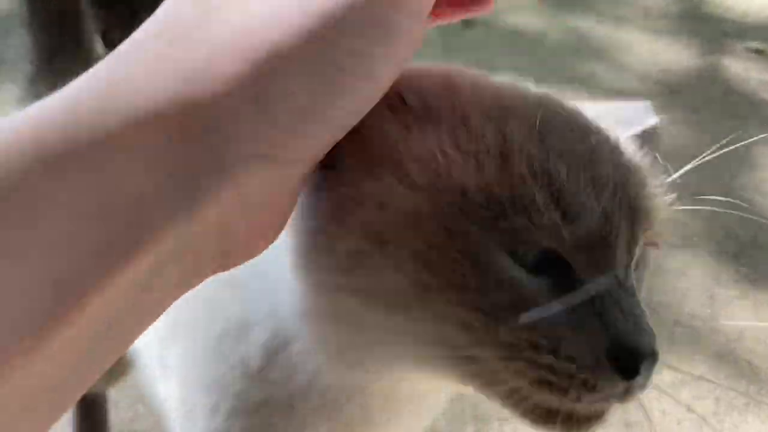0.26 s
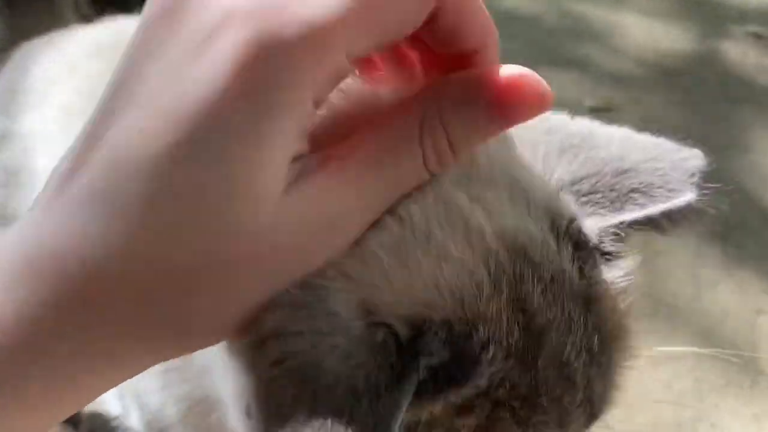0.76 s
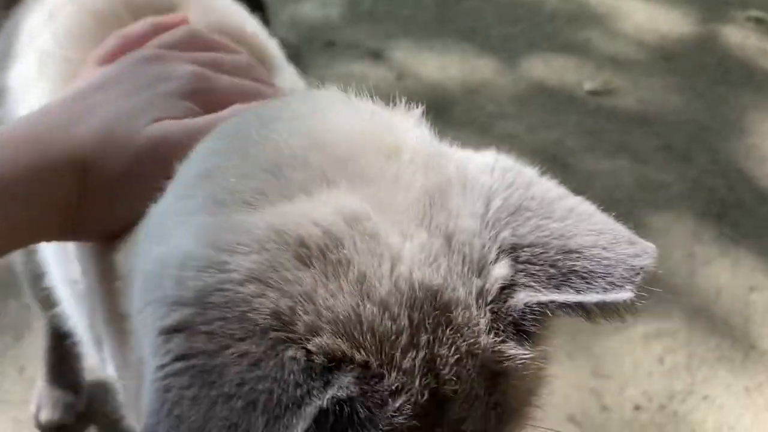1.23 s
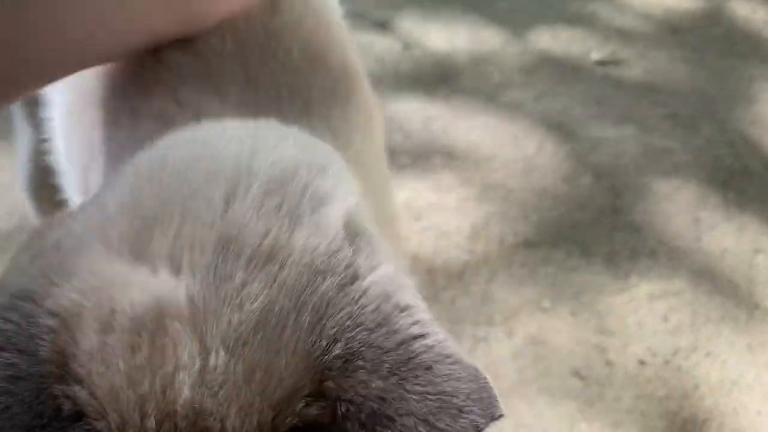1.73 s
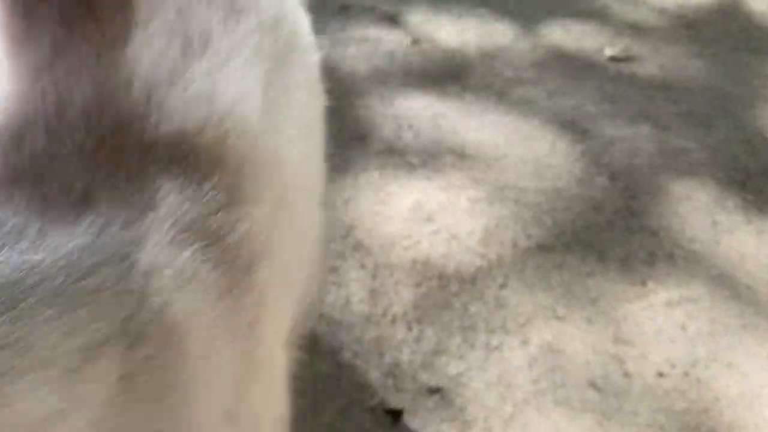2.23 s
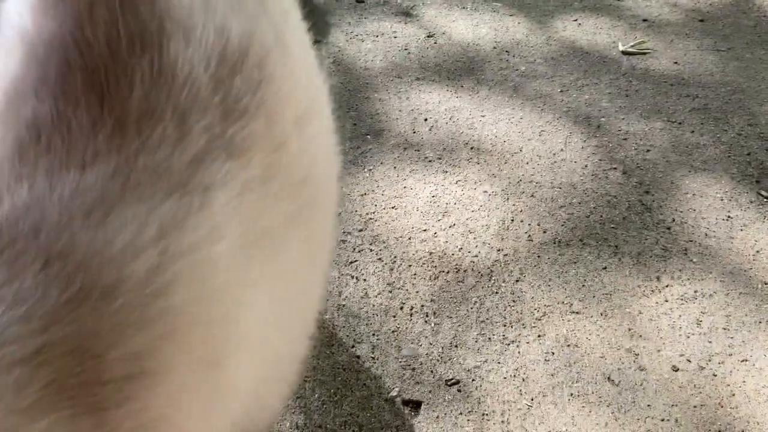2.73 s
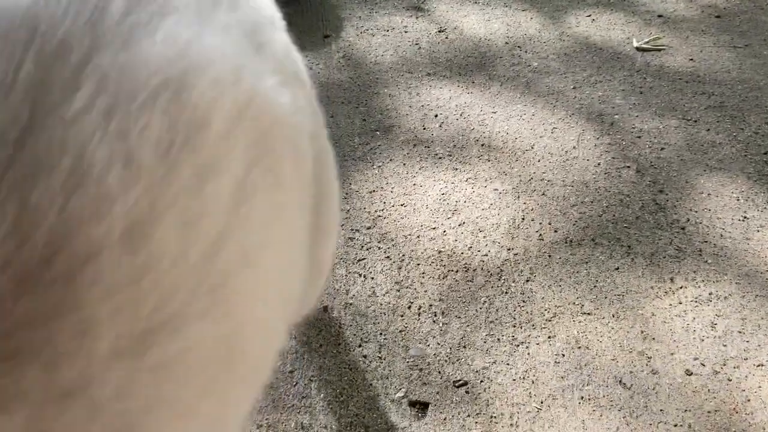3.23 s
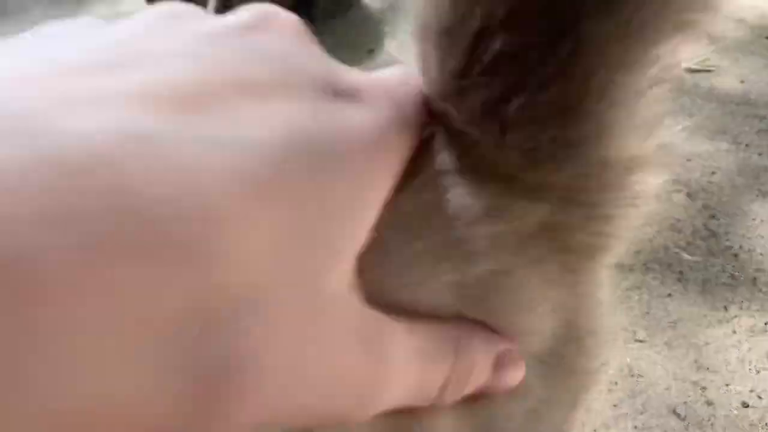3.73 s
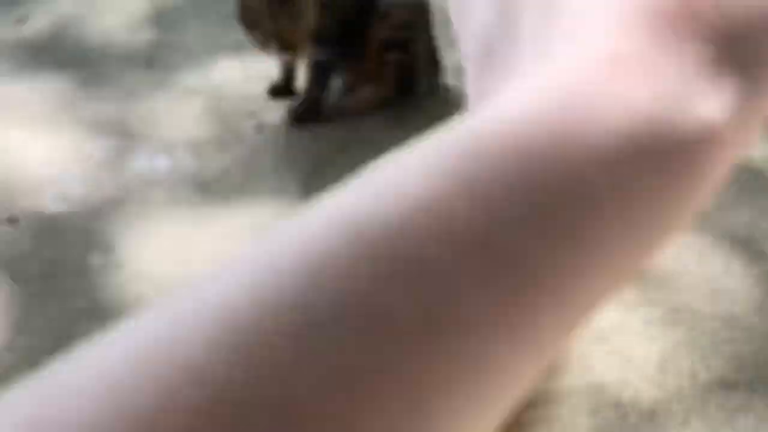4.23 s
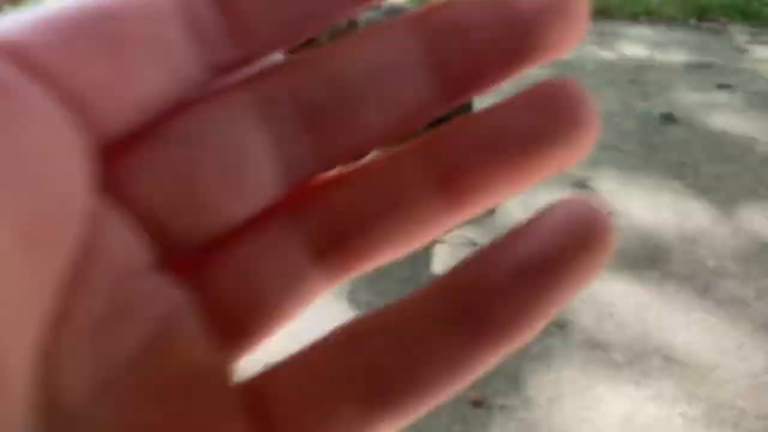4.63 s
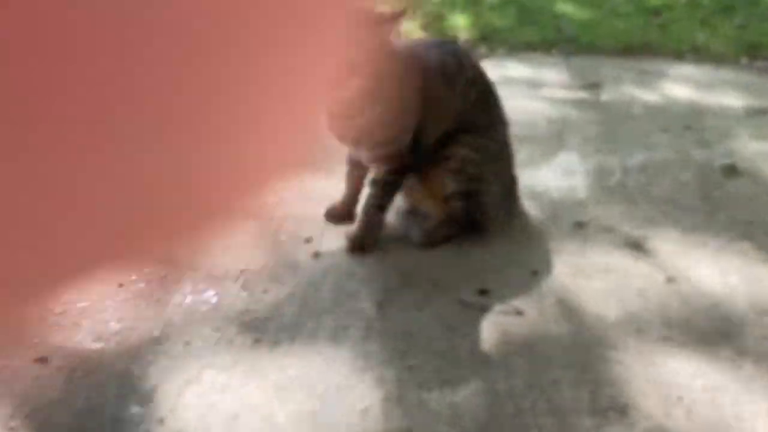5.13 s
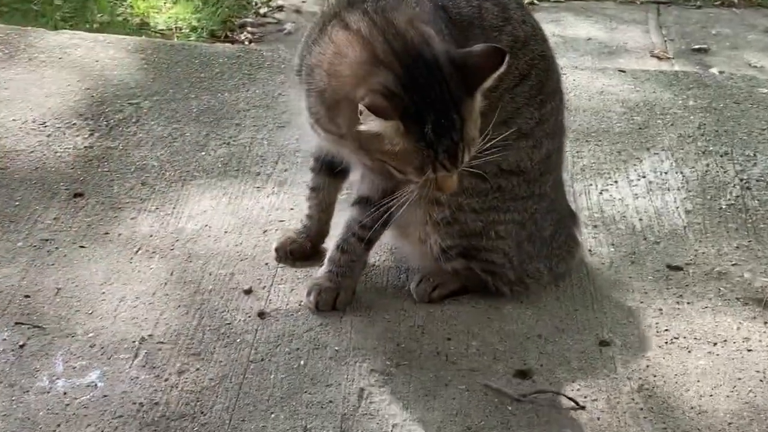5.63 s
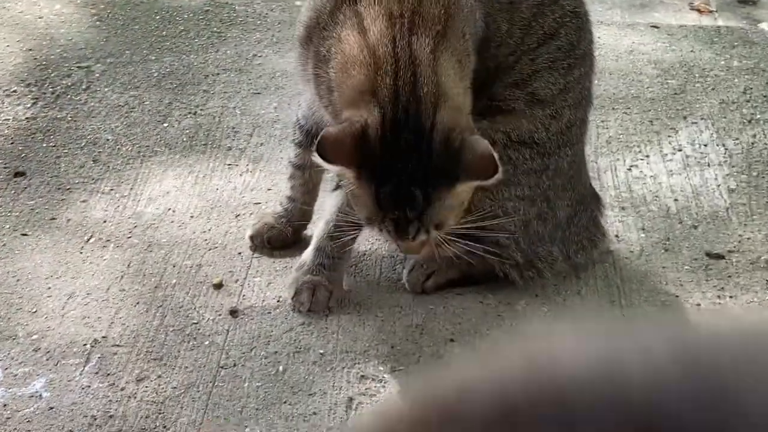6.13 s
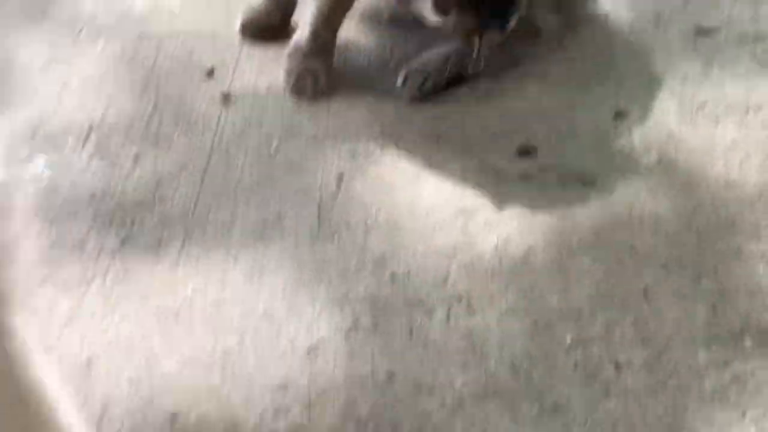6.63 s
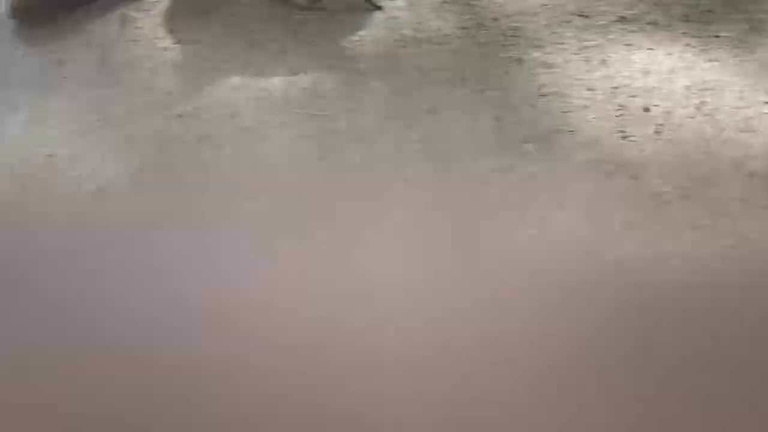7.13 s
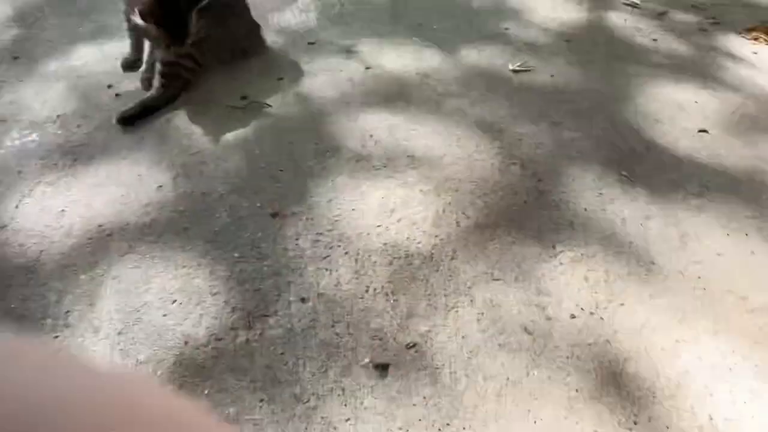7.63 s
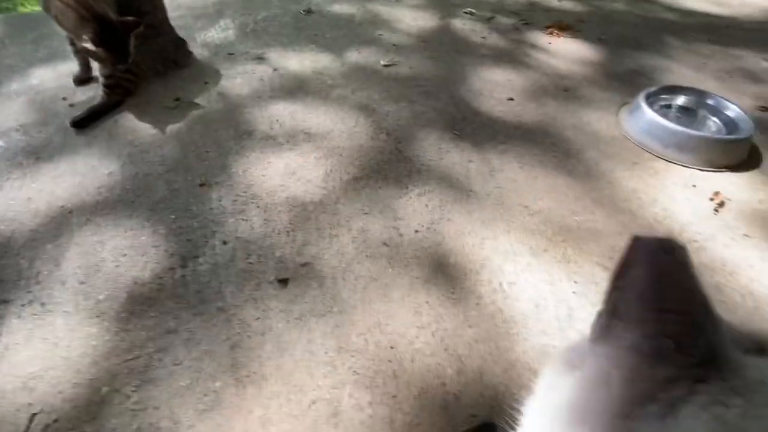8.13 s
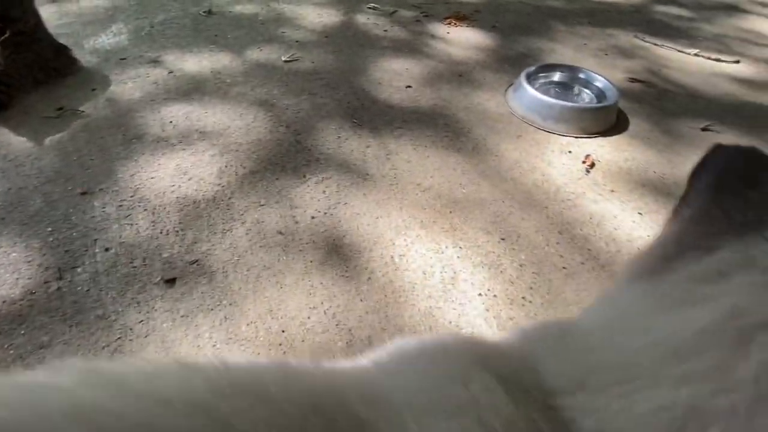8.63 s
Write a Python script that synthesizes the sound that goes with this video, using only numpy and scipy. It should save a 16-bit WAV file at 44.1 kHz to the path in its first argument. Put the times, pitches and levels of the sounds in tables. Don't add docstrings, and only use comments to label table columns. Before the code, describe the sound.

Close, hand-held outdoor sound: intermittent soft purring with a low chest hum, fur brushing and tiny claw or grit ticks. Short sliding bird trills appear in the first half. Low knocks of handling cluster in the middle, small brittle bites follow, and a heavy double bump comes before the purr returns. Behind are pulsing insects, breezy leaves, thin motor hum and low traffic.

```python
import sys
import numpy as np
from scipy import signal
from scipy.fft import rfft, irfft
from scipy.io import wavfile
from scipy.ndimage import uniform_filter1d

SR = 44100
rng = np.random.default_rng(int(sys.argv[2]) if len(sys.argv) > 2 else 0)


def boost_factor(decibels):
    exponent = np.asarray(decibels, float) / 20
    return 10 ** exponent


def generate_wav(signal):
    frames = np.transpose(np.atleast_2d(signal))
    scaled = np.clip(frames, -1, 1) * 32767
    pcm = np.round(scaled).astype(np.int16)
    wavfile.write(sys.argv[1], SR, pcm)


N = 391608
TIME = np.arange(N) / SR
HZ = np.maximum(np.arange(N // 2 + 1) * SR / N, 1)


def rms_one(x):
    return x / np.sqrt(np.mean(x ** 2) + 1e-20)


def in_time(rows):
    s, db = np.transpose(rows)
    return np.interp(TIME, s, db)


def at_hz(points):
    hz, db = np.transpose(points)
    return boost_factor(np.interp(np.log(HZ), np.log(hz), db))


def drift(rate_hz):
    r = np.exp(-80 * np.pi * rate_hz / SR)
    slow = signal.lfilter([1], [1, -2 * r, r * r], rng.standard_normal(N // 40 + 2002))[2000:]
    return np.interp(np.arange(N) / 40, np.arange(len(slow)), rms_one(slow))


def band(x, low_hz, high_hz, order=2):
    edges_hz = [low_hz, min(high_hz, SR / 2.2)]
    return signal.sosfilt(signal.butter(order, edges_hz, "band", fs=SR, output="sos"), x)


def ring(clicks, hz, t60_s):
    r, w = boost_factor(-60 / (t60_s * SR)), 2 * np.pi * hz / SR
    return signal.lfilter([0, np.sin(w)], [1, -2 * r * np.cos(w), r * r], clicks + 1e-18)


def swell(clicks, hz, t60_s):
    rung = ring(ring(clicks, hz, t60_s), hz * 1.04, t60_s * .75)
    return rung * clicks.max() / np.abs(rung).max()


def spell(start_s, end_s, edge, t=TIME):
    from_edge_s = np.minimum(t - start_s, end_s - t)
    return np.clip(from_edge_s / (edge * (end_s - start_s)), 0, 1) ** 2


def hum(start_s, end_s, hz, level_db, edge):
    out, on = np.zeros(N), slice(int(start_s * SR), int(end_s * SR))
    wobble = rng.random() + .05 * np.sin(2 * np.pi * (1.3 * TIME[on] + rng.random()))
    tone = np.sin(2 * np.pi * (hz * TIME[on] + wobble))
    out[on] = spell(start_s, end_s, edge, TIME[on]) * boost_factor(level_db) * tone
    return out


def evenly(first_s, last_s, rate_hz):
    return np.linspace(first_s, last_s, round((last_s - first_s) * rate_hz) + 1)


def placed(x, pan_db):
    return x * boost_factor(np.multiply.outer([.5, -.5], pan_db)).reshape(2, -1)


def wide(gain, side_gain):
    quarter_share = 0.54
    mid, other = rfft(rng.standard_normal((2, N)))
    side = side_gain * (quarter_share * 1j * mid + np.sqrt(1 - quarter_share ** 2) * other)
    mid, side = irfft(gain * np.array([mid, side]), N)
    return np.array([mid + side, mid - side]) / mid.std()


def add(out, start_s, sound):
    i = max(round(start_s * SR), 0)
    out[:, i:i + sound.shape[1]] += sound[:, :N - i]


def purr():
    # first_s, last_s, top_effort_db, tiring_db_per_s, pan_db (L-R)
    bouts = [
        (0.272, 0.556, -59, 24, 3),
        (1.647, 2.064, -69, -7, 9),
        (6.623, 6.808, -58.5, 64, 0),
        (7.934, 8.367, -60.5, 5, 0),
        (8.511, 8.682, -61, 55, -10),
    ]
    # hz, level_db, t60_s
    body = [(176, -1.5, 0.056), (330, -11.5, 0.029), (960, -15, 0.013)]
    throat_hz, rise_s, rise_db = 557, 0.07, 17
    out = np.zeros((2, N))
    for first_s, last_s, top_db, tiring_db, pan_db in bouts:
        at = evenly(0, last_s - first_s, 28)
        for s, chance in zip(at, rng.standard_normal((20, 6))):
            effort_db = top_db - rise_db * max(1 - s / rise_s, 0) - tiring_db * max(s - rise_s, 0)
            snap = np.zeros(SR // 20)
            snap[0] = boost_factor(effort_db + 8.5 + 1.5 * chance[1])
            hz = throat_hz * (1.05 - 0.091 * s / at[-1] + 0.061 * chance[2])
            rings = swell(snap, hz, 0.02)
            for (body_hz, db, t60_s), c in zip(body, chance[3:]):
                rings = rings + boost_factor(db + 2.1 * c) * swell(snap, body_hz, t60_s)
            add(out, first_s + s + 0.00064 * chance[0], placed(rings, pan_db))
    return out


def chest_hum():
    # start_s, end_s, purr_rate_hz, second_multiple_db, third_multiple_db
    breaths = [(0.155, .6, 28.04, -58, -58), (0.683, 1.446, 28.22, -51, -56),
               (1.604, 1.95, 28.1, -56, -58.5), (1.945, 2.35, 28.2, -54, -68),
               (3.05, 3.445, 28.1, -59, -62), (3.597, 4.05, 28.3, -55.5, -61),
               (4.16, 4.5, 27.84, -54.5, -62), (7.65, 8.1, 27.2, -60, -68), (8.14, 8.8, 28.2, -57.5, -64.5)]
    chest = 0
    for start_s, end_s, hz, second_db, third_db in breaths:
        chest = chest + hum(start_s, end_s, 2 * hz, second_db + 2.0, edge=0.31)
        chest = chest + hum(start_s, end_s, 3 * hz, third_db + 5.5, edge=0.22)
    return placed(chest, -1.3)


def bumps():
    # start_s, peak_db, start_hz, end_hz, swell_s
    knocks = [
        (4.589, -34.5, 205, 74, 0.016),
        (4.625, -31, 108, 77.5, 0.013),
        (4.853, -30, 220, 62, .011),
        (5.071, -43, 303, 90, 0.0043),
        (5.431, -50, 257, 152, 0.016),
        (7.258, -30, 130.8, 64, 0.01),
    ]
    # start_s, peak_db, start_hz, end_hz, swell_s
    pulls = [
        (7.1327, -19.5, 445, 58, 0.011),
    ]
    out, t = np.zeros((2, N)), np.arange(0, .12, 1 / SR)
    for s, peak_db, start_hz, end_hz, swell_s, way in [(*row, 1) for row in knocks] + [(*row, -1) for row in pulls]:
        hz = end_hz + (start_hz - end_hz) * np.exp(-t / .0068)
        shape = (t / (2 * swell_s)) ** 1.42 * np.exp(1 - (t / (2 * swell_s)) ** 2)
        swoop = np.sin(2 * np.pi * np.cumsum(hz) / SR)
        add(out, s, placed(way * boost_factor(peak_db) * shape * swoop, -0.93))
    return out


def ticks():
    # start_s, peak_db, pitch_hz, pan_db (L-R)
    snaps = [(0.894, -54, 1170, -4), (1.465, -54, 802, -5), (1.884, -57, 2740, 14), (2.014, -53, 991, 4),
             (3.221, -51, 2740, 2), (4.587, -47, 702, 13), (4.838, -47, 2500, 8), (4.847, -49, 2680, -3),
             (5.039, -51, 802, -0.5), (5.069, -44.5, 904, 8), (5.087, -51, 4720, -17),
             (5.093, -38, 4700, 4), (6.204, -53, 4650, -0.5), (6.952, -51, 2430, 11), (7.052, -52, 2260, 2),
             (7.13, -42.5, 840, 2), (7.252, -44, 900, -1.0), (7.824, -52, 4700, -2), (7.97, -49, 802, 0.5)]
    out, t = np.zeros((2, N)), np.arange(0, .03, 1 / SR)
    for s, peak_db, hz, pan_db in snaps:
        snap = .35 * rng.standard_normal(len(t)) * np.exp(-t / .0018)
        snap[0] = 2
        tick = band(snap, 500, 3050) + 1.43 * band(snap, hz / 1.63, hz * 1.29)
        add(out, s, placed(boost_factor(peak_db - 2.5) * tick / np.abs(tick).max(), pan_db))
    return out


def bites():
    # middle_s, half_length_s, level_db, tilt_db_per_octave, mouth_pitch_ratio
    crunches = [
        (4.388, 0.021, -65.5, -4, 0.94),
        (5.442, 0.014, -55, -4, 1.01),
        (6.064, 0.017, -55, 0.5, .93),
        (6.883, 0.023, -62.5, -4.5, 0.93),
    ]
    # hz, width_hz, level_db
    mouth = [(1200, 260, 2.5), (2400, 440, 4), (3480, 350, 11), (4450, 680, 6), (5250, 540, 2.5)]
    out = np.zeros((2, N))
    for s, half_s, level_db, tilt_db, ratio in crunches:
        t = np.arange(-3 * half_s, 8 * half_s, 1 / SR)
        roughness_db = 3.5 * np.repeat(rng.standard_normal(len(t)), 40)[:len(t)]
        grains = rng.standard_normal(len(t)) * boost_factor(roughness_db)
        voiced = 0
        for hz, width_hz, db in mouth:
            resonance = band(grains, ratio * hz - width_hz / 2, ratio * hz + width_hz / 2)
            voiced = voiced + boost_factor(db + tilt_db * np.log2(hz / 2500)) * resonance
        shape = np.exp(-(t / half_s) ** 2) + .25 * (t > 0) * np.exp(-t / .04)
        add(out, s - 3 * half_s, placed(boost_factor(level_db) * shape * rms_one(voiced), -.3))
    return out


def brushes():
    # middle_s, half_length_s, level_db, low_hz, high_hz
    strokes = [(0.074, 0.059, -73.5, 1460, 3700), (0.917, 0.079, -76, 1500, 4980),
               (2.157, 0.058, -69.5, 1800, 3170), (3.025, 0.097, -73, 1870, 3280),
               (3.754, 0.082, -72.5, 1700, 3710), (4.564, 0.017, -63.5, 1200, 2050),
               (4.62, 0.078, -64, 450, 4640), (4.733, 0.054, -71, 796, 3040),
               (6.171, 0.13, -68.5, 2310, 5030), (7.154, 0.02, -62, 801, 15000),
               (7.853, 0.043, -64, 1000, 11000), (7.958, 0.026, -53.5, 8700, 15700),
               (7.952, 0.051, -66, 1510, 6200), (8.068, 0.0074, -58, 1200, 12000),
               (8.112, 0.043, -64.5, 1090, 3100)]
    out = np.zeros((2, N))
    for s, half_s, level_db, low_hz, high_hz in strokes:
        t = np.arange(max(-2.5 * half_s, -s), 2.7 * half_s, 1 / SR)
        snags = boost_factor(2.2 * np.repeat(rng.standard_normal(len(t) // 150 + 1), 150)[:len(t)])
        mid, side = band(snags * rng.standard_normal((2, len(t))), low_hz, high_hz)
        fibres = np.array([mid + 0.79 * side, mid - 1.06 * side]) / mid.std()
        add(out, s + t[0], boost_factor(level_db) * np.exp(-(t / half_s) ** 2) * fibres)
    return out


def bird():
    # first_note_s, last_note_s, first_hz, level_db, pan_db (L-R)
    trills = [
        (0.039, 0.173, 2500, -64.5, 8.5),
        (0.772, 0.929, 3250, -71.5, 3),
        (2.349, 2.672, 3480, -66.5, -2),
        (3.374, 3.544, 3240, -73, -1),
    ]
    notes_per_s, fall_hz_per_s = 31.2, 1340
    out, t = np.zeros((2, N)), np.arange(-.015, .05, 1 / SR)
    shape = np.exp(-(t / 0.01) ** 4) + 0.16 * (t > 0) * np.exp(-t / 0.011)
    for first_s, last_s, first_hz, level_db, pan_db in trills:
        at = evenly(first_s, last_s, notes_per_s)
        width_hz = 430 * (3480 / first_hz) ** 3.8
        for k, (s, chance) in enumerate(zip(at, rng.standard_normal((16, 2)))):
            share = (s - first_s) / (last_s - first_s)
            hz = (first_hz - fall_hz_per_s * (s - first_s)) * (1 + .012 * chance[0])
            breath = rng.standard_normal(len(t) + 500)
            note = rms_one(band(breath, hz - width_hz / 2, hz + width_hz / 2)[500:])
            if width_hz < 700:
                note = note + np.sin(2 * np.pi * hz * t * (1 - 1.5 * t))
            arch_db = -14 * (share - .42) ** 2 - 2.0 * (k % 2)
            note_db = level_db - 3.0 + arch_db + 2.0 * chance[1]
            add(out, s + t[0], placed(boost_factor(note_db) * shape * note, pan_db))
    return out


def chorus(zeal_db, keen_db):
    # hz, width_hz, level_db, side_mid_db
    resonances = [(6470, 410, 2, -6), (7280, 710, -2.5, -10), (8000, 250, -9, 0.5)]
    throb_s, throb_first_s = .322, 5.74
    throb_db = (0.34 + .2 * keen_db) * np.cos(2 * np.pi * (TIME - throb_first_s) / throb_s)
    buzz = 0
    for hz, width_hz, db, side_db in resonances:
        buzz_db = 1.1 * drift(30) + 1.2 * drift(4.2)
        buzz = buzz + boost_factor(db + buzz_db) * wide(1 / (1 + (2 * (HZ - hz) / width_hz) ** 2), boost_factor(side_db))
    return boost_factor(zeal_db + throb_db) * buzz / buzz.mean(axis=0).std()


def chirper(keen_db):
    chirp_s, chirp_first_s = .355, 0.555
    chirp_db = 2 * np.cos(2 * np.pi * (TIME - chirp_first_s) / chirp_s)
    bursts_db = 1.2 * drift(6) + 1.5 * drift(25)
    level_db = -80.5 + 0.6 * keen_db + chirp_db - 1.0 + bursts_db
    return boost_factor(level_db) * wide(1 / (1 + ((HZ - 4680) / 210) ** 2), 0.79)


def whine():
    # start_s, end_s, level_db
    spells = [
        (2.1, 3.496, -90),
        (3.75, 5.31, -88.5),
        (5.995, 6.495, -107),
        (7.997, 8.945, -89),
    ]
    turns = 2736 * TIME + .2 * drift(8) + np.array([[.1], [-.1]])
    waver_db = 2.5 * drift(6)
    strength = boost_factor(-88) + sum(boost_factor(db) * spell(a, b, edge=0.072) for a, b, db in spells)
    return strength * boost_factor(6.5 + waver_db) * np.sin(2 * np.pi * turns)


def insects():
    zeal_db = in_time([(0, -63.5), (.3, -66.5), (4.4, -67), (5.0, -62), (5.75, -61.5), (6.4, -60.5),
                       (6.52, -63.5), (7.05, -64), (7.5, -60.5), (7.8, -59), (8.2, -64), (8.88, -63)])
    keen_db = zeal_db - zeal_db.min()
    return chorus(zeal_db, keen_db) + chirper(keen_db) + whine()


def leaves():
    near_db = in_time([(0, -85), (.25, -83.5), (.45, -75.5), (.75, -77), (1.0, -75), (1.75, -73.5),
                       (2.5, -76), (2.95, -80), (3.45, -76.5), (3.6, -72), (3.95, -72), (4.4, -79),
                       (4.62, -72), (4.95, -80.5), (6.3, -79.5), (7.15, -73), (7.9, -72), (8.88, -73.5)])
    # hz, level_db_per_hz
    spectrum = [(1500, -18), (2500, 5.5), (3800, 3.5), (5400, -1), (8000, 1), (10000, -12), (11800, -7),
                (14500, -4), (16000, -7)]
    side = at_hz([(1500, -7), (2500, -2), (4000, -1), (4700, -14), (5400, -24), (7000, -1), (9000, 11)])
    far_db = -88 + 0.33 * (near_db - near_db.mean())
    bright = 1 / (1 + (8800 / HZ) ** 12)
    colour = at_hz(spectrum) / (1 + (1300 / HZ) ** 4)
    far = boost_factor(far_db + 11.0 + 1.0 * drift(2.2)) * wide(colour * np.sqrt(1 - bright), side)
    near = 0
    for half in (HZ < 12000, HZ >= 12000):
        near = near + boost_factor(near_db + 1.0 + 1.3 * drift(9.2)) * wide(colour * np.sqrt(bright) * half, 1.1)
    return far + near


def motors():
    # hz, level_db
    steady = [(107.7, -59.5)]
    # start_s, end_s, hz, level_db
    passing = [
        (2.6, 4.6, 71.4, -64),
        (5.3, 7.6, 166.7, -60.5),
        (8.15, 8.85, 147.3, -69),
    ]
    lines = sum(hum(*row, edge=0.26) for row in passing)
    for hz, db in steady:
        turns = hz * TIME + 0.037 * drift(1.0)
        lines = lines + boost_factor(db + 2 + .9 * drift(0.96)) * np.sin(2 * np.pi * turns)
    return placed(lines, -1.3)


def traffic():
    rumble_db = in_time([(0, -51), (1.0, -51), (1.5, -53), (3.0, -53), (4.4, -56), (5.6, -50.5),
                         (6.2, -55.5), (6.9, -51.5), (8.0, -59.5), (8.6, -59.5), (8.88, -53.5)])
    # hz, level_db_per_hz
    spectrum = [(13, -59), (22, -14), (62, 6.5), (101, -1), (150, -8.5), (215, -13), (325, -13), (474, -23),
                (544, -23.5), (1050, -35.5), (1930, -38.5), (2500, -39), (3250, -80), (5500, -120)]
    side = at_hz([(30, -17), (90, -7), (180, -8), (350, -7), (700, -1.5), (1400, 3), (2500, -2)])
    drone_db = -60.5 - 0.37 * (rumble_db - rumble_db.mean())
    deep = 1 / (1 + (HZ / 130) ** 6)
    colour = at_hz(spectrum) / (1 + (HZ / 3000) ** 4)
    rumble = boost_factor(rumble_db - 2.5 + 0.42 * drift(7.4)) * wide(colour * np.sqrt(deep), side)
    drone = boost_factor(drone_db + 3.0 + 1.7 * drift(9.0)) * wide(colour * np.sqrt(1 - deep), side)
    return (rumble + drone) * boost_factor([[-.35], [.35]])


def scene():
    cat = purr() + chest_hum()
    close = bumps() + ticks() + bites() + brushes()
    return cat + close + bird() + insects() + leaves() + motors() + traffic()


def thinned(x, gaps, hole_db):
    # start_s, end_s, extra_db
    starved = [
        (0, .3, 2),
        (1.1, 1.55, 1.8),
        (1.55, 2.05, 3.4),
        (2.3, 2.9, 1.4),
        (3.2, 3.55, 2),
        (7.7, 8.9, 3.4),
    ]
    hz, s, cells = signal.stft(x, SR, nperseg=1024, noverlap=512)
    rows_hz = hz[:, None]
    for low_hz, high_hz, start_s, end_s in gaps:
        ragged_hz = 150 * np.round(1.1 * uniform_filter1d(rng.standard_normal((2, len(s))), size=3))
        lost = (rows_hz > low_hz + ragged_hz[0]) & (rows_hz < high_hz + ragged_hz[1])
        cells[lost & (s >= start_s) & (s < end_s)] *= .003
    patches = uniform_filter1d(uniform_filter1d(np.abs(cells) ** 2, size=5, axis=0), size=3, axis=1)
    here = np.exp(uniform_filter1d(np.log(patches + 1e-30), size=25, axis=1))
    reference = np.median(here[(hz > 1500) & (hz < 2600)])
    usual = here * np.clip(np.sqrt(reference / here), .5, 2.2)
    for start_s, end_s, extra_db in starved:
        hole_db = hole_db + extra_db * (rows_hz < 6000) * (s >= start_s) * (s < end_s)
    cells[(rows_hz > 1500) & (patches < usual * boost_factor(2 * hole_db))] *= .05
    return signal.istft(cells, SR, nperseg=1024, noverlap=512)[1][:N]


def low_pass(x):
    return signal.sosfilt(signal.butter(12, 16090, fs=SR, output="sos"), x)


def record(dry):
    # low_hz, high_hz, start_s, end_s
    mid_gaps = [
        (8400, 9680, 0, 7.68),
        (12520, 13880, 0, 9),
        (15780, 17000, 0, 9),
    ]
    # low_hz, high_hz, start_s, end_s
    side_gaps = [
        (10200, 11800, 0, 9),
        (14500, 17000, 0, 9),
        (2500, 7600, 5.22, 7.66),
    ]
    mid = thinned(dry.mean(axis=0), mid_gaps, hole_db=-5.6)
    side = thinned((dry[0] - dry[1]) / 2, side_gaps, hole_db=-4.6)
    return low_pass(np.array([mid + side, mid - side]))


dry = scene()
out = record(dry)
generate_wav(out)
```